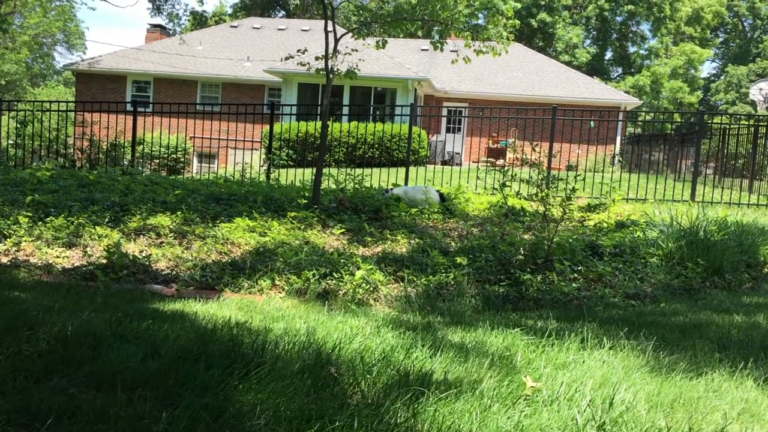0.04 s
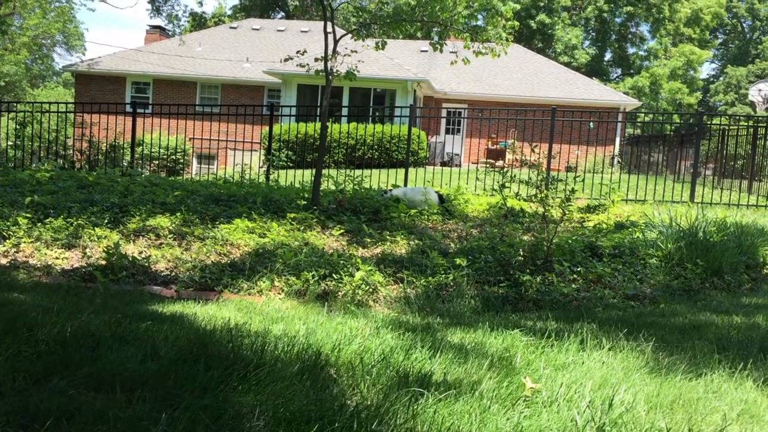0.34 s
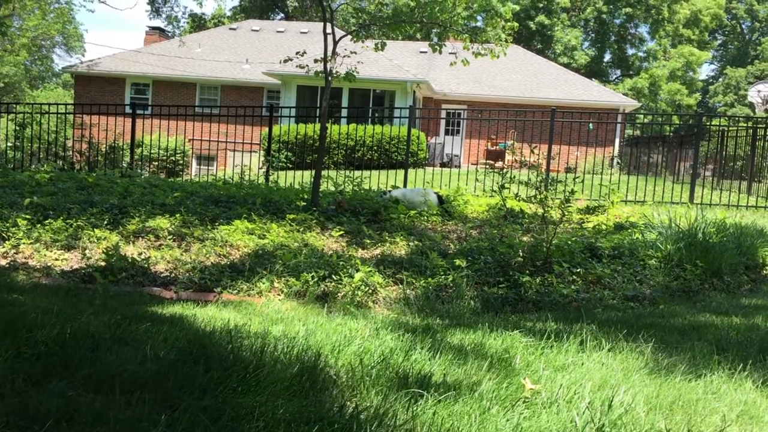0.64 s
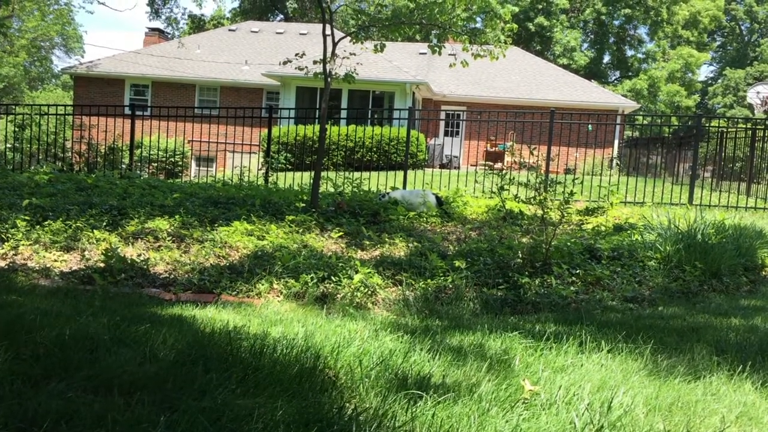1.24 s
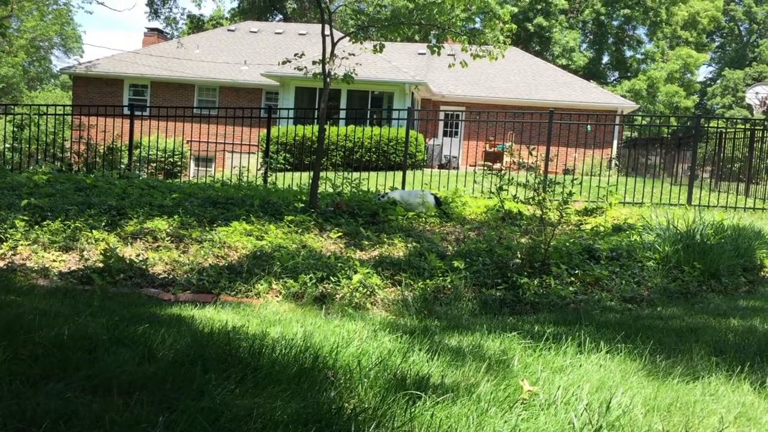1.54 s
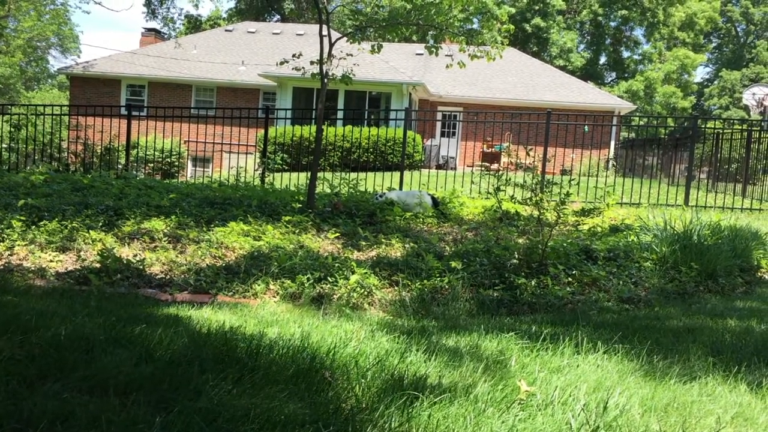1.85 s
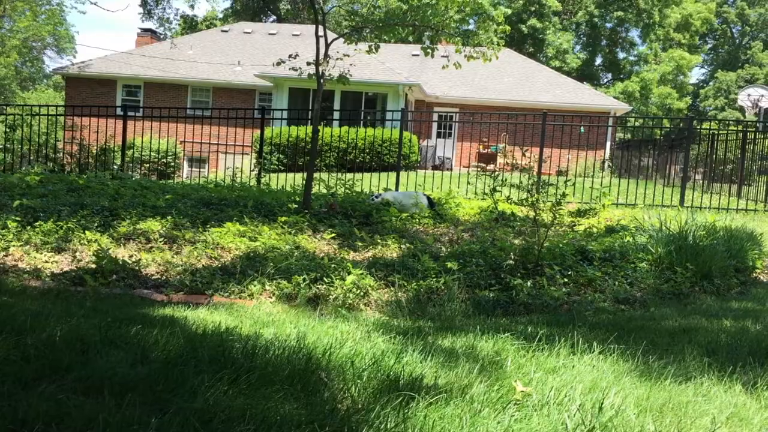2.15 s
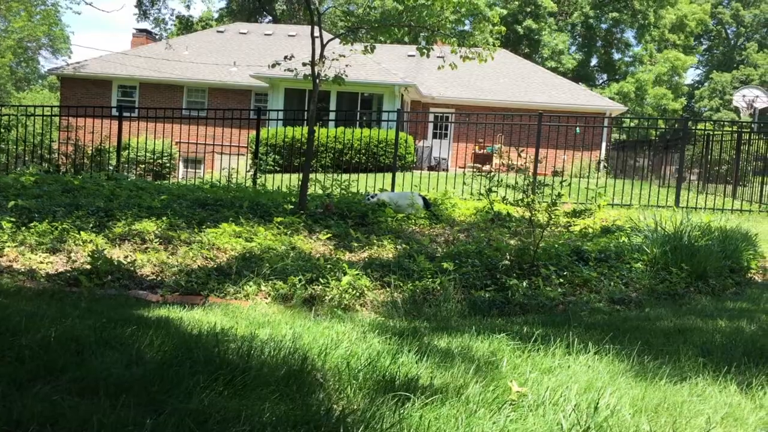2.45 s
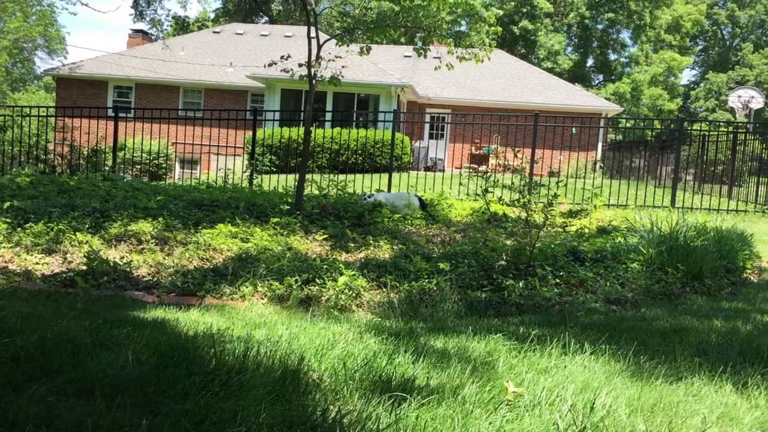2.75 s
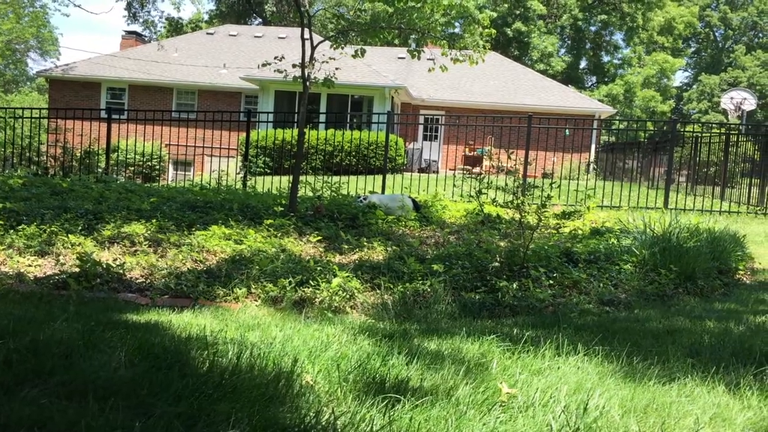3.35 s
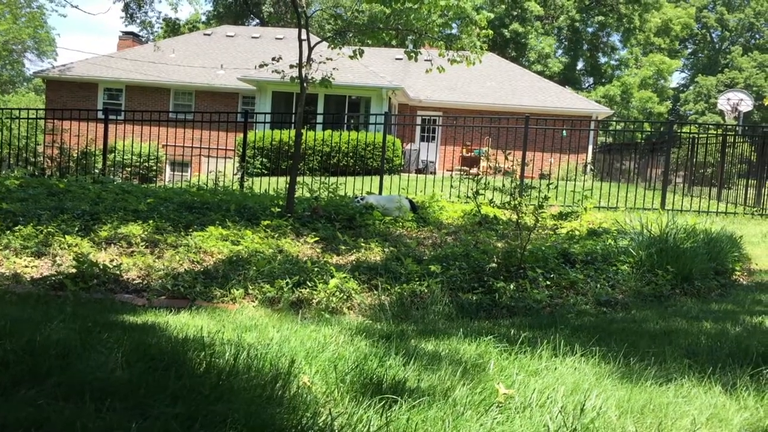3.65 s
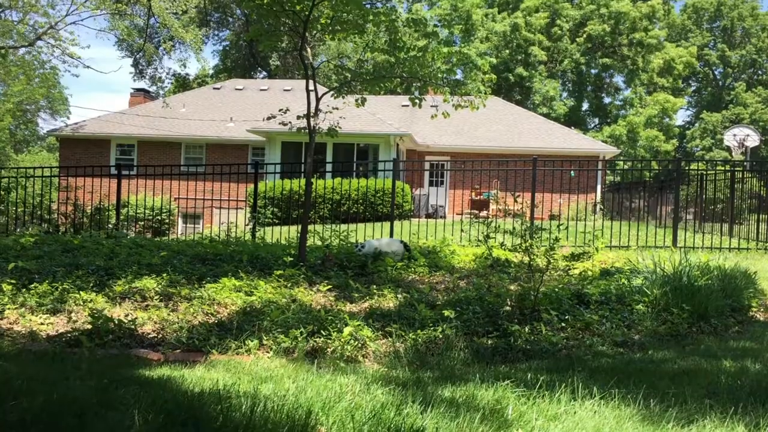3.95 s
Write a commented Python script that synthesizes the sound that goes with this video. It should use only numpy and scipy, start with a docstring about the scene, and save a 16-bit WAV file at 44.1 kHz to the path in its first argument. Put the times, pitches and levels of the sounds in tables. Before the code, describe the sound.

Small birds some way off scold in quick rasps, pause, then chatter again with short peeps. Thin high whistles and a faint warble come from the garden trees, over low machine hum, distant traffic and light wind on the microphone.

```python
"""A quiet summer garden. Small birds some way off scold in quick rasps, pulses and hiss ringing the throat:
first five alone, then a chatter mixed with short peeps. Thin falling whistles and a faint warble, both
gliding sines, come from the trees. A wall slaps the calls back and the trees add a soft tail.
Underneath sits a bed of low machine hum, distant traffic and a little wind; one small tick sounds nearby."""
import sys
import numpy as np
from scipy import signal
from scipy.fft import rfft, irfft, next_fast_len
from scipy.io import wavfile
from scipy.ndimage import uniform_filter1d, map_coordinates

SR = 44100
rng = np.random.default_rng(int(sys.argv[2]) if len(sys.argv) > 2 else 0)


def master(y):
    """Save y as 16-bit WAV."""
    cut = np.clip(np.atleast_2d(y).T, -1, 1)
    pcm = np.round(cut * 32767)  # scale
    wavfile.write(sys.argv[1], SR, pcm.astype(np.int16))


N = 176400
TIME = np.arange(N) / SR

# the motor's upper hum lines: f/Hz, level/dB, pitch waver/Hz, level swing/dB
HUM_LINES = [(122.55, -45, 1.903, 4), (193.3, -48.6, 1.79, 3), (288, -60.5, 2.45, 4.5)]
# fader ride of its deepest line, ahead of the trim: t/s, level/dB
DRONE_RIDE = [(0, -60), (.22, -33), (.55, -56.5), (1.1, -44), (1.36, -35), (1.6, -41), (1.9, -36),
              (2.7, -37.5), (3.45, -35), (3.7, -33), (3.9, -40)]
# puffs of wind on the microphone: t/s, level/dB
WIND_PUFFS = [(.225, -32.5), (0.379, -30.5), (0.879, -31.5), (.96, -28), (1.19, -35), (1.37, -28),
              (2.35, -38)]
# EQ of the wind: f/Hz, level/dB
WIND_EQ = [(15, -28), (28, -27), (42, -4), (60, 2), (80, -0.5), (120, -13), (250, -20.5), (600, -84)]
# EQ of the traffic rumble: f/Hz, level/dB
TRAFFIC_EQ = [(30, -38), (70, -2), (110, 1), (150, -3), (185, -0.5), (230, -7.5), (300, -15.5),
              (400, -21.5), (700, -47.5), (2000, -65)]
# EQ of the swell in the upper rumble: f/Hz, level/dB
SWELL_EQ = [(100, -33), (150, -3), (220, -2.5), (285, 4), (350, -9.5), (600, -50)]
# EQ of the open air: f/Hz, level/dB
AIR_EQ = [(150, -28), (450, -5), (700, -2), (950, 2), (1400, -3), (2200, -8), (3200, -13), (5000, -15.5),
          (6800, -16), (7800, -19.5), (9700, -20), (10400, -27), (11200, -22.5), (15500, -27.5)]
# thin whistles: start t/s, length t/s, final f/Hz, level/dB
WHISTLE_CUES = [(0.012, 0.069, 6270, -51.5), (0.088, 0.054, 6200, -60), (0.45, 0.061, 6260, -51.5),
                (0.62, 0.035, 7200, -56.5), (0.652, 0.038, 8380, -58.5), (.675, 0.025, 7150, -56),
                (0.752, 0.044, 6180, -54.5), (1.136, .055, 6220, -58.5), (1.763, 0.059, 6230, -54),
                (2.000, .040, 7450, -57), (2.06, .052, 6200, -53.5), (2.095, 0.023, 6970, -50.5),
                (2.345, 0.027, 7000, -63), (2.815, 0.056, 6200, -54), (3.111, 0.052, 6320, -56),
                (3.624, 0.04, 6930, -59)]
# scolding calls: start t/s, length t/s, level/dB, first centre f/Hz, last centre f/Hz
RASP_CUES = [(0.03, 0.057, -43.5, 3413, 3340), (0.159, 0.063, -43.5, 3460, 3620),
             (0.245, 0.059, -44, 3604, 3560), (0.338, 0.055, -41, 3680, 3590),
             (0.436, 0.053, -42.5, 3785, 3584), (2.144, 0.042, -49.5, 3300, 3310),
             (2.182, 0.03, -42, 3810, 3470), (2.231, 0.061, -46.5, 3680, 3300),
             (2.291, 0.036, -47.5, 3500, 3610), (2.325, 0.039, -41, 3700, 3070),
             (2.402, 0.037, -43.5, 3780, 3570), (2.5, 0.046, -43, 3900, 3340),
             (2.604, 0.064, -43, 3566, 3220), (2.716, .045, -50.5, 3566, 3440),
             (3.257, 0.064, -50, 3400, 3410), (3.460, 0.056, -46.5, 3680, 3430),
             (3.588, 0.06, -49, 3335, 3410), (3.688, 0.052, -48, 3444, 3270)]
# resonance of the scolding throat: f/Hz, level/dB
THROAT_EQ = [(1000, -19), (1800, -7.5), (2500, -1), (3100, 0), (3600, 0.5), (4200, 1.5), (4700, -7),
             (5300, -17), (7000, -36), (11000, -52)]
# the calls turn hoarser: t/s, share of power in clear partials
RASP_CLARITY = [(.45, 0.64), (2.45, 0.44), (3.4, .12)]
# early reflections off the wall: delay t/s, gain
WALL_TAPS = [(.00363, .55), (.00587, .25), (.01043, .22)]
# a far songbird's notes: start t/s, length t/s, first f/Hz, last f/Hz, level/dB
WARBLE_CUES = [(0.843, 0.026, 1934, 2070, -53), (1.327, 0.024, 2420, 2650, -53.5),
               (1.403, 0.029, 1750, 1995, -47.5), (1.443, 0.033, 2580, 2320, -53.5),
               (1.494, 0.048, 2080, 2410, -58), (1.543, 0.023, 2540, 2620, -53.5),
               (1.913, .075, 2270, 2800, -61)]
# fader ride of birds scolding further off: t/s, level/dB
CHATTER_RIDE = [(2.05, -64), (2.2, -50.5), (2.4, -52), (2.7, -52), (3.3, -54), (3.7, -57), (3.95, -62.5)]
# EQ of that far chatter: f/Hz, level/dB
CHATTER_EQ = [(1500, -15), (2500, -5.5), (3300, 0), (4100, 0), (4700, -6), (5300, -7.5), (6200, -14),
              (9000, -24)]
# peeps among the rasps: centre t/s, level/dB
PEEP_CUES = [(2.255, -47), (2.301, -47), (2.319, -49), (2.377, -46.5), (2.409, -43.5), (2.433, -47.5),
             (2.453, -44.5), (2.516, -48), (2.606, -42.5), (2.755, -50), (2.830, -49.5), (2.901, -52.5),
             (2.987, -54), (3.057, -46.5), (3.226, -51), (3.304, -48), (3.346, -55), (3.379, -51.5)]
# ringing modes of the tick: f/Hz, relative level/dB
TICK_RING = [(600, 5), (950, 9.5), (1220, 3), (1700, 6.5), (1950, 3)]


def amp(db):
    """Decibels to gain."""
    return 10 ** (np.asarray(db) / 20)


def unit(x):
    """Scale to rms 1."""
    return x / np.sqrt(np.mean(x ** 2) + 1e-20)


def clock(length):
    """Sample times over a length in seconds."""
    return np.arange(max(int(length * SR), 8)) / SR


def curve(rows):
    """An automation lane through (t/s, value) rows."""
    return np.interp(TIME, *np.transpose(rows))


def bump(at_s, width_s):
    """A bell-shaped fade up and down."""
    return np.exp(-.5 * ((TIME - at_s) / width_s) ** 2)


def wobble(rate):
    """A smooth random LFO, rate knots a second."""
    return map_coordinates(rng.standard_normal(4096), [TIME * rate + 2], mode="wrap")


def equalise(x, eq):
    """x through an EQ of (f/Hz, level/dB) points."""
    size = next_fast_len(N + 8192)
    hz, db = np.transpose(eq)
    gain = amp(np.interp(np.log(np.fft.rfftfreq(size, 1 / SR) + 1), np.log(hz), db))
    return irfft(rfft(x, size) * gain, size)[:N]


def noise(eq):
    """Coloured noise of rms 1."""
    return unit(equalise(rng.standard_normal(N), eq))


def patchy(x, depth_db):
    """Mottle x with random gain over time and frequency, less in the treble; rms 1."""
    spectrum = signal.stft(x, nperseg=2048)[2]
    patches = uniform_filter1d(rng.standard_normal(spectrum.shape), size=3, axis=0)
    patches = unit(uniform_filter1d(patches, size=4, axis=1))
    depth = depth_db * np.interp(np.linspace(0, SR / 2, len(spectrum)), [2000, 9000], [1, .3])
    return unit(signal.istft(spectrum * amp(depth[:, None] * patches), nperseg=2048)[1][:N])


def tone(hz):
    """A sine of rms 1 that follows a pitch."""
    return np.sqrt(2) * np.sin(2 * np.pi * (np.cumsum(hz) / SR + rng.random()))


def gate(t, attack_s, release_s):
    """Straight attack, hold and release."""
    return np.clip(np.minimum(t / attack_s, (t[-1] - t) / release_s), 0, 1)


def piece(x, start, t):
    """The stretch of x that a note covers."""
    return np.take(x, int(start * SR) + np.arange(len(t)), mode="wrap")


def add(out, start, x):
    """Mix x in at a time."""
    i = max(int(start * SR), 0)
    out[i:i + len(x)] += x[:max(N - i, 0)]


def machine(drone_hz=93.2, trim_db=-1.5):
    """A far motor hums in low lines, each unsteady in pitch and level."""
    drone_db = curve(DRONE_RIDE) + trim_db + 2.2 * wobble(16)
    out = amp(drone_db) * tone(drone_hz + 2.987 * wobble(14))
    for hz, db, waver_hz, swing_db in HUM_LINES:
        out += amp(db + swing_db * wobble(7)) * tone(hz + waver_hz * wobble(8))
    return out


def wind(calm_db=-41.5):
    """Wind buffets the microphone: short bassy puffs over a restless floor."""
    puffs = sum(amp(db) * bump(at, width_s=.028) for at, db in WIND_PUFFS)
    return np.hypot(puffs, amp(calm_db + 3.2 * wobble(15))) * noise(WIND_EQ)


def traffic(rumble_db=-40, swell_db=-47.5):
    """Distant traffic rumbles; its upper range swells for a moment."""
    rumble = amp(rumble_db + 1.3 * wobble(13)) * patchy(noise(TRAFFIC_EQ), depth_db=2)
    return rumble + amp(swell_db) * bump(at_s=1.485, width_s=.24) * noise(SWELL_EQ)


def air(level_db=-49.5):
    """The wide, even rush of the open air."""
    return amp(level_db + .043 * wobble(6.5)) * patchy(noise(AIR_EQ), depth_db=3)


def stray_notes(per_s=12, centre_hz=2300, note_s=.0383, level_db=-63):
    """Far birds sprinkle faint slurred notes at random pitches."""
    out, t = np.zeros(N), clock(note_s)
    for k, (late, pitch, slur, accent) in enumerate(rng.standard_normal((int(per_s * N / SR), 4))):
        hz = centre_hz * np.exp(.22 * pitch + .127 * slur * t / note_s)
        add(out, (k + late) / per_s, amp(level_db + 2 * accent) * np.hanning(len(t)) * tone(hz))
    return out


def whistles(swell_db=19, ripple_hz=110, ripple_s=.021):
    """Each whistle swells as it slides down, then ripples on its last pitch; fainter ones are wetter."""
    direct, send, waver = np.zeros(N), np.zeros(N), 95 * wobble(400)
    for start, length, final_hz, db in WHISTLE_CUES:
        t = clock(length)
        drop_hz = 18000 * length  # longer notes start higher
        height = np.maximum(1 - t / length / .54, 0) ** 1.2
        ripple = ripple_hz * (np.abs(np.sin(np.pi * (length - t) / ripple_s)) - .5)
        hz = final_hz + drop_hz * height + ripple + piece(waver, start, t)
        note = amp(db - swell_db * height) * gate(t, .0048, .011) * tone(hz)
        wet = np.interp(db, [-57, -51], [.85, .2])
        add(direct, start, np.sqrt(1 - wet) * note)
        add(send, start, np.sqrt(wet) * note)
    return direct + trees(send)


def throat(pulse_hz=622, jitter_periods=.22, breath_share=.35):
    """The grit of a rasp: irregular pulses and hiss ring the bird's throat."""
    count = int(N / SR * pulse_hz)
    late, accent = rng.standard_normal((count, 2)).T
    times = (np.arange(count) + jitter_periods * late) / pulse_hz
    samples = np.clip(times * SR, 0, N - 1).astype(int)
    pulses = unit(np.bincount(samples, amp(2 * accent), N))
    drive = np.sqrt(1 - breath_share) * pulses + np.sqrt(breath_share) * rng.standard_normal(N)
    return unit(equalise(drive, THROAT_EQ))


def rasps(core_hz=3562, spacing_hz=325, swell_db=9.5):
    """Throat grit around a cluster of wavering partials; each call swells, slides and stops."""
    grit = throat()
    centre_hz = core_hz + 45 * wobble(500)
    partials = np.zeros(N)
    for k in range(-3, 4):
        partial_db = -2 * abs(k) + 4 * wobble(35)
        partials += amp(partial_db) * tone(centre_hz + k * spacing_hz)
    clarity = curve(RASP_CLARITY)
    voice = np.sqrt(1 - clarity) * grit + np.sqrt(clarity) * unit(partials)
    out = np.zeros(N)
    for start, length, db, first_hz, last_hz in RASP_CUES:
        t = clock(length)
        varispeed = np.linspace(first_hz, last_hz, len(t)) / core_hz
        call = map_coordinates(piece(voice, start, clock(2 * length)), [np.cumsum(varispeed)])
        rise_db = swell_db * np.minimum(2 * t / length - 1, 0)  # full level by mid-call
        add(out, start, amp(db + rise_db) * gate(t, .0067, .018) * call)
    return out


def wall(x):
    """The dry calls, combed by early reflections off the wall."""
    return x + sum(gain * np.interp(TIME - delay, TIME, x, left=0) for delay, gain in WALL_TAPS)


def trees(x, t60_s=.28, bloom_s=.0066):
    """The diffuse tail that the trees scatter back, fully wet."""
    t = clock(.6)
    tail = rng.standard_normal(len(t)) * amp(-60 * t / t60_s) * (1 - np.exp(-t / bloom_s))
    return signal.fftconvolve(x, tail / np.linalg.norm(tail))[:N]


def warble():
    """A far songbird slurs a few soft notes."""
    out = np.zeros(N)
    for start, length, first_hz, last_hz, db in WARBLE_CUES:
        t = clock(length)
        add(out, start, amp(db) * gate(t, .013, .0086) * tone(np.linspace(first_hz, last_hz, len(t))))
    return out


def far_chatter():
    """Birds scolding further off blur into a flickering wash that comes up halfway through."""
    return amp(curve(CHATTER_RIDE) + 2.8 * wobble(34.96)) * patchy(noise(CHATTER_EQ), depth_db=5)


def peeps(top_hz=4124, arch_hz=60, length_s=.032):
    """Short arches of pitch, roughened by a fast waver."""
    out, waver, t = np.zeros(N), 111 * wobble(700), clock(length_s)
    across = 2 * t / length_s - 1
    for centre, db in PEEP_CUES:
        hz = top_hz - arch_hz * across ** 2 + piece(waver, centre, t)
        add(out, centre - length_s / 2, amp(db) * np.cos(np.pi * across / 2) ** 2 * tone(hz))
    return out


def tick(at_s=3.5095, gain_db=-34.3, ring_t60_s=.022, crack_t60_s=.014, lowpass_hz=3800):
    """One small, dull knock, close and dry: a crack of noise over quickly damped modes."""
    out, t = np.zeros(N), clock(.08)
    modes = sum(amp(db) * np.sin(2 * np.pi * (hz * t + rng.random())) for hz, db in TICK_RING)
    ring = .5 * amp(-60 * t / ring_t60_s) * modes
    crack = 2 * amp(-60 * t / crack_t60_s) * rng.standard_normal(len(t))
    add(out, at_s, amp(gain_db) * (ring + crack))
    return signal.lfilter(*signal.butter(4, lowpass_hz, fs=SR), out)


def scene():
    """The mono mix: birds and their reflections over the garden's bed."""
    scolding, song = rasps() + peeps(), warble()
    tail = amp(-11.5) * trees(scolding + 2 * song)
    birds = wall(scolding) + song + tail + whistles() + far_chatter() + stray_notes()
    return (birds + tick() + machine() + wind() + traffic() + air())[None]


def record(dry, dip_s=3.731, top_hz=15750):
    """The master: the level dips briefly near the end and stays a touch lower; a brick wall cuts the top."""
    dip_db = curve([(dip_s - .001, 0), (dip_s, -24), (dip_s + .009, -10), (dip_s + .0173, -2.5)])
    size = next_fast_len(N + 8192)
    passband = np.fft.rfftfreq(size, 1 / SR) < top_hz
    return irfft(rfft(dry * amp(dip_db), size) * passband, size)[..., :N]


dry = scene()
out = record(dry)
master(out)
```